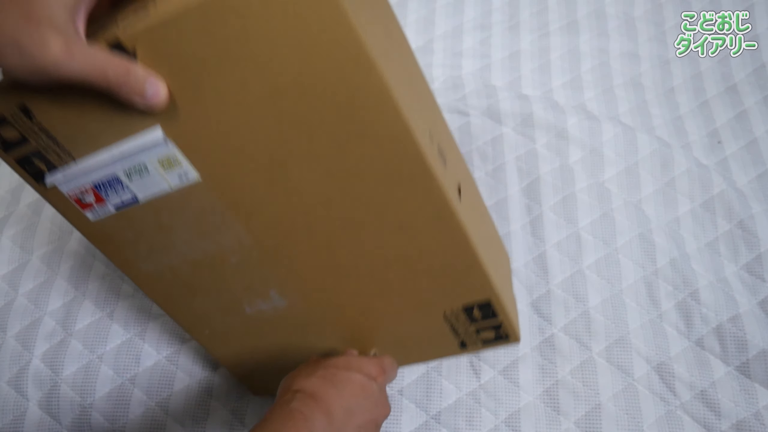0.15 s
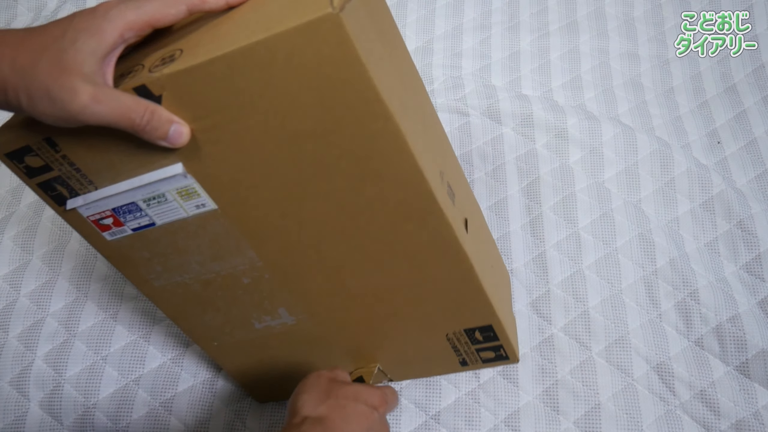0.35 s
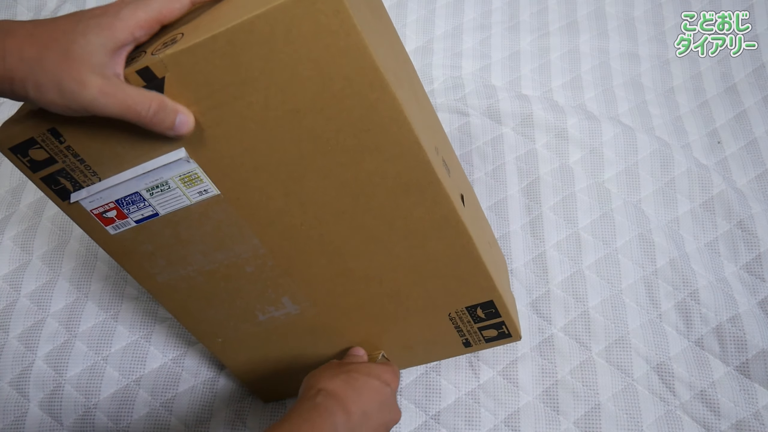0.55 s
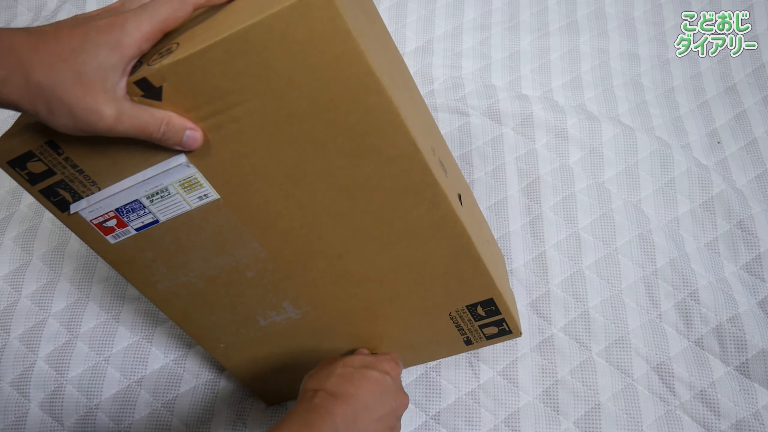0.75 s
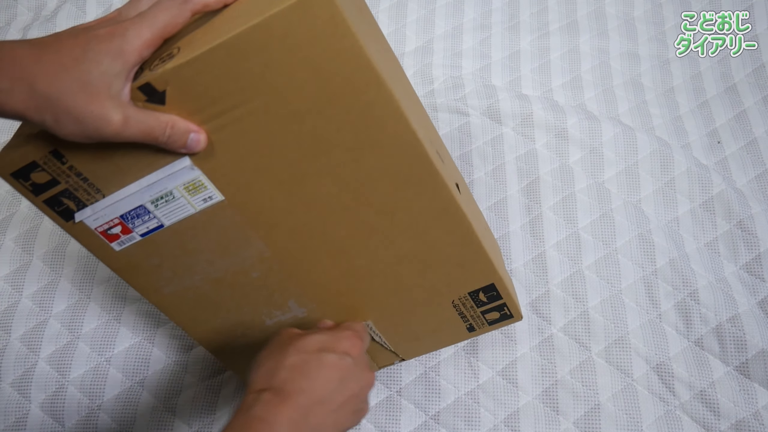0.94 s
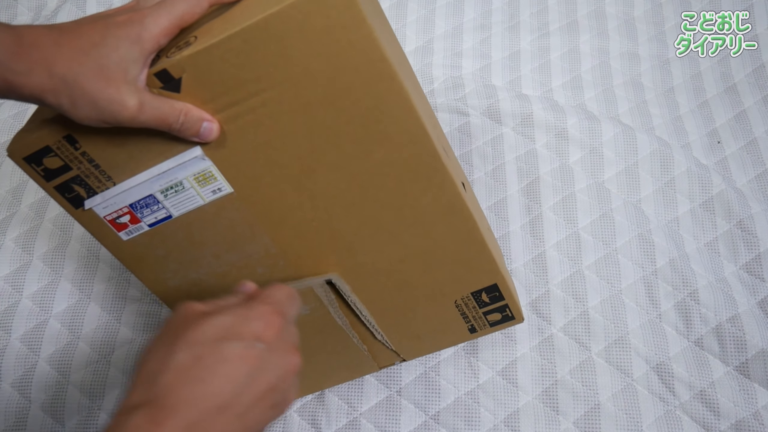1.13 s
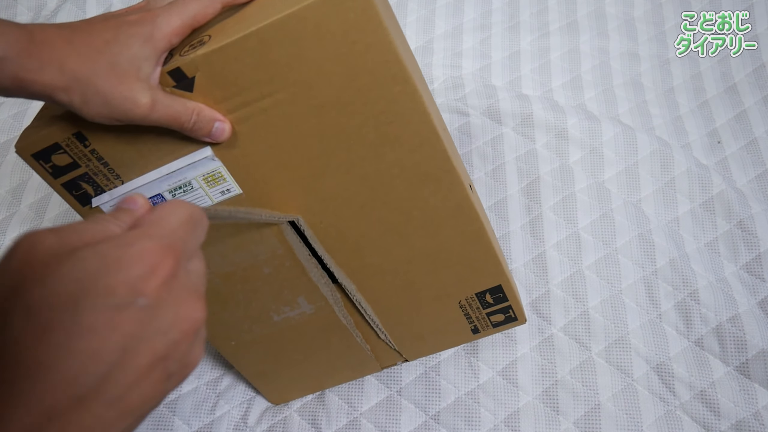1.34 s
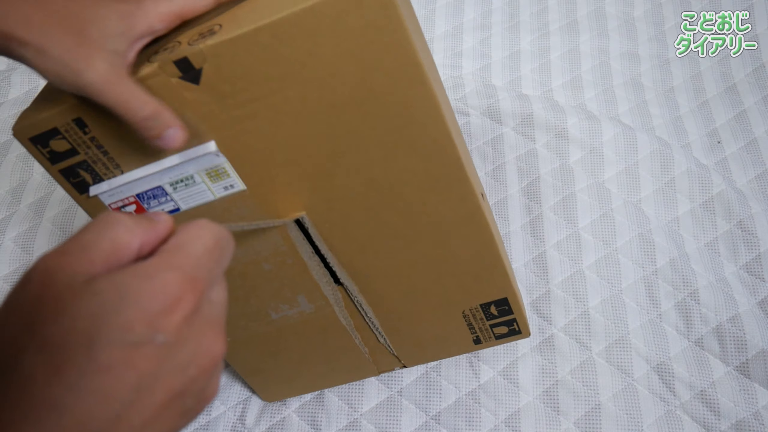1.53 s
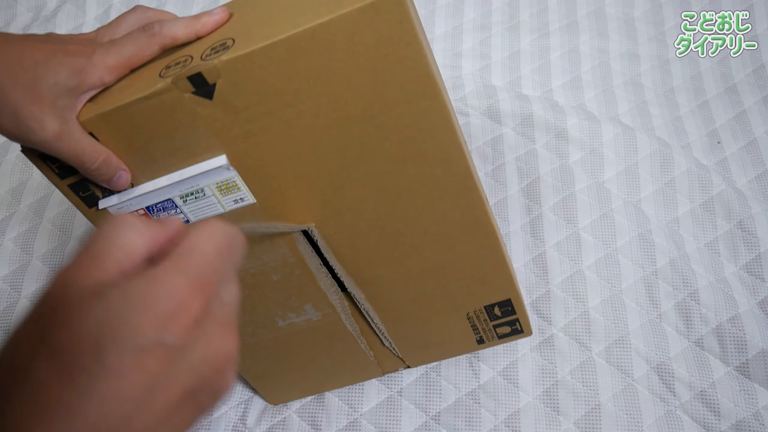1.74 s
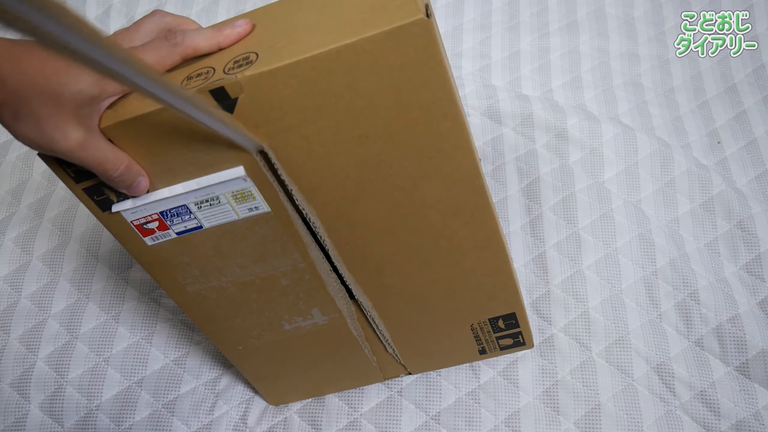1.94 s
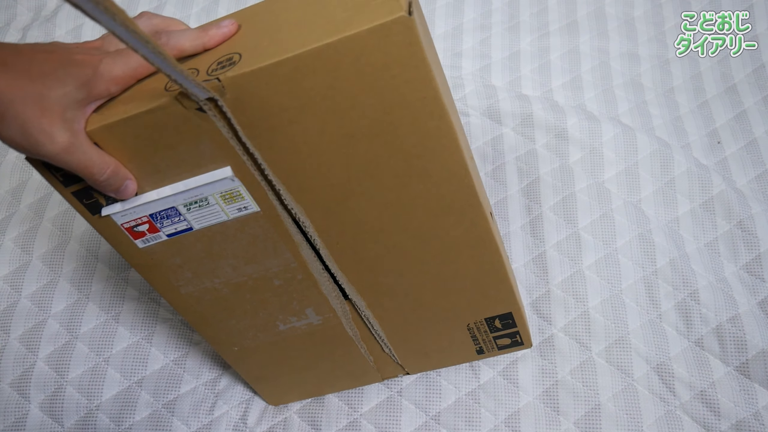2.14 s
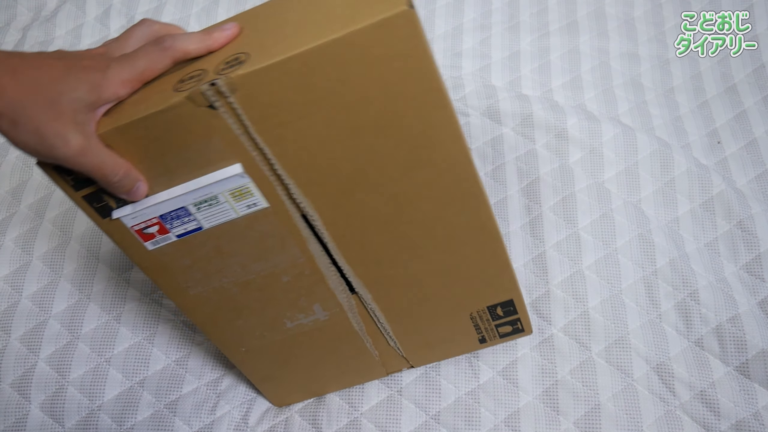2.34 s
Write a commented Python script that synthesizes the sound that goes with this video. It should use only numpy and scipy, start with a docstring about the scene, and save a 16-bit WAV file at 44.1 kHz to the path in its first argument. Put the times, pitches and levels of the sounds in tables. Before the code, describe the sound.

Cardboard box ripped open by hand. Until 0.7 s, nails tick on the tab, skin slides softly on card and a tiny motor ticks faintly until 0.4. From 0.76 to 1.45 a long rip crackles and hisses over rapid hollow thumps, rising in force. A faint slide and low knock follow, a second rip at 1.8-2.17, and a short hissy tear at 2.3. Close stereo, slightly left, soft quiet room.

```python
"""Two long rips and a short last one: the perforated strip is torn by hand out of a corrugated box.
Each bridge of the perforation thumps the ringing box; cracks and fibre hiss are shaped noise, the lid rattles.
Before that, nails tick on the pull tab, hands slide on the card and a small camera motor ticks faintly;
between the rips come a faint low knock and two duller ticks on the card. Place: a quiet soft room with a short
echo, faint low air. Distance: close, a little to one side. Microphone: the stereo pair of the camera."""
import sys
import numpy as np
from scipy import signal
from scipy.fft import rfft, irfft
from scipy.io import wavfile
from scipy.ndimage import uniform_filter1d

SR = 44100
rng = np.random.default_rng(int(sys.argv[2]) if len(sys.argv) > 2 else 0)


def decibels_to_gain(level_db):
    """Convert a level in decibels to a linear amplitude gain (20 dB per decade)."""
    exponent = np.asarray(level_db, float) / 20
    return 10 ** exponent


def log_audio(samples):
    """Write samples as a 16-bit WAV file to the path given in sys.argv[1]."""
    # one column per channel
    frames = np.atleast_2d(samples).T
    # limit to full scale, then quantise
    limited = np.clip(frames, -1, 1)
    pcm = np.round(limited * 32767).astype(np.int16)
    wavfile.write(sys.argv[1], SR, pcm)


N = 109323  # samples

# Spectrum of the room air: f/Hz, level/dB
AIR_SPECTRUM = [(30, 1.5), (230, -26), (460, -21), (820, -32), (16000, -41.5)]
# Spectrum of skin sliding on card: f/Hz, level/dB
SKIN_SPECTRUM = [(700, 5), (2000, -5.5), (7900, 0.5), (16000, -5)]
# Hands sliding on the card: centre t/s, half length t/s, hiss level/dB, rumble level/dB
HAND_SLIDES = [(0.192, 0.14, -53.5, -60), (0.61, 0.18, -52, -54), (0.641, 0.018, -39.5, -60),
               (0.736, 0.022, -45.5, -49.5), (1.547, 0.06, -55, -48.5), (1.7, 0.067, -46, -64)]
# Nail ticks, on the tab in the first second, later two duller ones on the card:
# t/s, push on the panel level/dB, tick level/dB
NAIL_TICKS = [(0.163, -42.5, -56), (0.203, -40, -46), (0.334, -47.5, -42.5), (0.395, -47.5, -32.5),
              (0.404, -44, -33.5), (0.529, -32, -28.5), (0.611, -48, -31.5), (0.632, -43, -26.5),
              (1.795, -56, -34.5), (2.258, -64, -37.5)]
# Modes of the pull tab and the panel round it: f/Hz, level/dB, t60/s
TAB_MODES = [(481, -3.5, 0.11), (575.4, 7, 0.06), (634.6, 3, 0.06)]
# Bright note of a nail tick: f/Hz, level/dB, t60/s
NAIL_MODES = [(1340, 3.5, .015)]
# Modes of the hollow box: f/Hz, level/dB
BOX_MODES = [(72, -3), (108, -6), (142, 3), (192, -5.5), (214, 5.5), (245, -1.5), (320, -6.5)]
# Deepest box modes, whose drive rises and falls over the rips: t/s, drive level/dB
DEEP_DRIVE = [(1.15, -3), (1.35, -24), (1.85, -25), (1.95, -19.5), (2.2, -3.5)]
# The pulled panel tightens and slackens: t/s, pitch of the box modes [ratio]
PANEL_TENSION = [(.9, 0.84), (1.32, 1.088), (1.4, 0.93), (1.83, 0.93), (1.93, 1.04), (2.01, 0.94)]
# Modes of the stiff lid beside the slit: f/Hz, level/dB, t60/s
LID_MODES = [(485.2, -0.5, 0.054), (684, -5.5, 0.011), (1127, -12, 0.03)]
# Spectrum of torn card: f/Hz, level/dB
CARD_SPECTRUM = [(900, -4.5), (2300, -8), (4200, -2.5), (6800, -2.5), (8700, 1.5), (10600, -5),
                 (12500, -3.5), (15500, -9.5), (16300, -55)]
# One list for each pull: t/s, fibre hiss level/dB, shaking of the box level/dB, rattle of the lid level/dB
PULL_LEVELS = [
    [(.762, -35, -35, -32.5), (.768, -32.5, -34.5, -30.5), (.825, -36, -60, -44),
     (.845, -27.5, -24.5, -33.5), (1.11, -30, -22.5, -33), (1.24, -38, -24.5, -35), (1.38, -40, -16, -30.5),
     (1.42, -40.5, -51, -51), (1.47, -62, -35, -53)],
    [(1.805, -47, -50, -53), (1.815, -32.5, -23, -32), (1.93, -34.5, -21.5, -32.5),
     (1.99, -36.5, -24.5, -38), (2.05, -38, -22, -39.5), (2.09, -31.5, -26, -33.5),
     (2.15, -38, -37.5, -44.5), (2.18, -61, -61, -69)],
    [(2.272, -51.5, -54, -74), (2.288, -27, -34.5, -28.5), (2.315, -29, -34, -32.5),
     (2.39, -70.5, -83, -82)],
]
# Thumps of the box: bridges breaking, and one faint low knock at 1.743 before the second rip:
# t/s, relative level/dB
BOX_THUMPS = [(0.867, -13), (0.914, -9.5), (0.963, -15), (0.998, -9.5), (1.074, -12), (1.12, -9.5),
              (1.138, -11), (1.169, -4.5), (1.21, -6.5), (1.224, -10), (1.26, -4.5), (1.276, -3.5),
              (1.301, -8), (1.32, -6), (1.367, -5.5), (1.743, -33), (1.816, -12.5), (1.837, -1),
              (1.866, -16), (1.894, -7.5), (1.907, -11.5), (1.966, -9), (2.01, -11.5), (2.032, -11.5),
              (2.073, -8.5), (2.289, -28)]
# Sharp cracks of the paper liner: t/s, relative level/dB
LINER_CRACKS = [(0.853, -13.5), (0.9017, -11), (0.952, -16.5), (0.988, -17.5), (1.0284, -18.5),
                (1.066, -18), (1.8159, -19), (1.838, -13.5), (1.919, -22.5)]

AIR_DB = -54
WIDE_HZ, WIDE_DB = 2780, -1.5  # corner and level of the left-right difference in every noise
MOTOR_START_S, MOTOR_STOP_S, MOTOR_PER_S = .012, 0.41, 59.94
MOTOR_HZ, MOTOR_T60_S, MOTOR_DB = 2000, 0.029, -33
WEAK_DB, MOTOR_SCATTER_DB = -4, 2.5  # every second tick; spread of all ticks
NAIL_S, TICK_S = .0005, 0.0019  # push of the nail, also its delay; decay of the tick
TAB_RUMBLE_DB, TAB_FREE_S = 8, 1  # tab panel against the box; the tab fades out of the rumble by then
BOX_T60_S, BOX_DAMPING = 0.17, 0.49  # at 200 Hz; power of frequency, so higher modes die sooner
DEEP_UNDER_HZ = 160
BOX_BAND_HZ, LID_LOW_HZ = (58, 350), 430  # band edges that keep the box's thump and the lid's rattle apart
LID_WANDER = .025  # pitch, as a ratio
CRACK_RISE_S, CRACK_FALL_S, CRACK_DB = .0025, .002, -5
THUMP_PUSH_S, THUMP_DB, THUMP_HISS_DB = 0.0022, -8.5, -12
FIBRES_PER_S, FIBRE_SCATTER_DB, FIBRE_S = 2500, 2.5, 0.0016
HISS_DB = -2  # on top of the hiss column of the pulls
PATCHES_PER_S, PATCH_DB = 140, 3
ROOM_T60_S, ROOM_LOW_HZ, ROOM_GAP_S, ROOM_DB = 0.1, 930, 0.0016, -11
RIGHT_LAG_S, LEFT_DB, MIC_LOW_HZ = 4e-5, 1, 50


def unit(x):
    """Scale to rms 1."""
    return x / np.sqrt(np.mean(x ** 2))


def noise(spectrum):
    """Steady noise of a spread-out source: left and right share the bass and differ in the treble."""
    hz, db = np.array(spectrum).T
    f = np.arange(N // 2 + 1) * SR / N + 1  # 1 Hz up, to keep the logarithm finite
    colour = decibels_to_gain(np.interp(np.log(f), np.log(hz), db))
    mid, side = rfft(rng.standard_normal((2, N))) * colour
    side = side * decibels_to_gain(WIDE_DB) * f / np.hypot(f, WIDE_HZ)
    return unit(irfft(mid + np.array([[1], [-1]]) * side, N))


def ring(x, modes, pitch=1):
    """Damped modes whose pitch may glide; a unit impulse gives each its own peak level."""
    turn = 2j * np.pi * np.cumsum(pitch + np.zeros(N)) / SR
    total = 0
    for hz, db, t60 in modes:
        carrier = np.exp(hz * turn)
        # decay at zero frequency, then shift up to the mode
        decay = signal.lfilter([1], [1, -decibels_to_gain(-60 / (t60 * SR))], x / carrier)
        total = total + decibels_to_gain(db) * (carrier * decay).real
    return total


def spikes(times, db):
    """Impulses at the given times."""
    times = np.asarray(times)
    at = np.clip((times * SR).astype(int), 0, N - 1)
    return np.bincount(at, decibels_to_gain(db + 0. * times), N)


def burst(x, rise_s, fall_s):
    """Every impulse becomes a quick swell and fall of its own peak."""
    t = np.arange(-SR // 20, SR // 20 + 1) / SR
    shape = np.exp(np.where(t < 0, t / rise_s, -t / fall_s))
    return np.abs(signal.fftconvolve(x, shape, "same"))


def soften(x, push_s):
    """Spread every impulse into a smooth push of the same area."""
    push = np.exp(-(np.arange(-SR // 100, SR // 100 + 1) / (SR * push_s / 2)) ** 2)
    return np.convolve(x, push / push.sum(), "same")


def walk(per_s):
    """Random levels, held briefly and slewed."""
    hold = SR // per_s
    steps = np.repeat(rng.standard_normal(N // hold + 1), hold)
    return uniform_filter1d(steps, hold // 2)[:N]


def steep(x, hz, kind):
    """Steep filter without delay."""
    return signal.sosfiltfilt(signal.butter(2, hz, kind, fs=SR, output="sos"), x)


def patchy(x):
    """Each half octave swells and drops on its own, so that the colour of the crackle keeps changing."""
    edges = 540 * 2 ** np.arange(0, 5.1, .5)
    bands = zip(edges, edges[1:])
    return unit(sum(decibels_to_gain(PATCH_DB * walk(PATCHES_PER_S)) * steep(x, band, "band") for band in bands))


def room_air():
    """Room air: steady noise, strongest in the bass."""
    return decibels_to_gain(AIR_DB) * noise(AIR_SPECTRUM)


def room_echo(near):
    """The soft room returns a short diffuse tail without deep bass, different left and right."""
    t = np.arange(SR // 2) / SR
    tail = rng.standard_normal((2, len(t))) * decibels_to_gain(-60 * t / ROOM_T60_S) * (t > ROOM_GAP_S)
    tail = tail / np.sqrt(np.sum(tail[0] ** 2))
    tail = signal.lfilter(*signal.butter(1, ROOM_LOW_HZ, "high", fs=SR), tail)
    return decibels_to_gain(ROOM_DB) * signal.fftconvolve(near, tail, axes=1)[:, :N]


def motor():
    """Regular faint ticks, each a short push on one damped mode, every second one weaker on average."""
    k = np.arange(int((MOTOR_STOP_S - MOTOR_START_S) * MOTOR_PER_S))
    db = WEAK_DB * (k % 2) + MOTOR_SCATTER_DB * rng.standard_normal(len(k))
    ticks = spikes(MOTOR_START_S + k / MOTOR_PER_S, db)
    return ring(soften(ticks, 0.0005), [(MOTOR_HZ, MOTOR_DB, MOTOR_T60_S)])


def box(x):
    """The hollow box rings: panel tension moves its pitch and the drive of its deepest modes rises and falls."""
    t = np.arange(N) / SR
    free = decibels_to_gain(np.interp(t, *np.array(DEEP_DRIVE).T))
    pitch = np.interp(t, *np.array(PANEL_TENSION).T)
    total = 0
    for hz, db in BOX_MODES:
        drive = x * free if hz < DEEP_UNDER_HZ else x
        t60 = BOX_T60_S * (200 / hz) ** BOX_DAMPING
        total = total + ring(drive, [(hz, db, t60)], pitch)
    return total


def slides():
    """Skin on card: soft swells of hiss, and a rumble in the box and the tab panel."""
    t = np.arange(N) / SR
    hiss, rumble = np.zeros((2, N))
    for centre, half, hiss_db, rumble_db in HAND_SLIDES:
        swell = np.exp(-((t - centre) / half) ** 2)
        hiss += decibels_to_gain(hiss_db) * swell
        rumble += decibels_to_gain(rumble_db) * swell
    tab_share = decibels_to_gain(TAB_RUMBLE_DB) * np.clip(1 - t / TAB_FREE_S, .05, 1)
    body = unit(box(rng.standard_normal(N)))
    body = body + tab_share * unit(ring(rng.standard_normal(N), TAB_MODES))
    return hiss * noise(SKIN_SPECTRUM) + rumble * body


def nail_ticks():
    """A nail ticks and the panel rings briefly: bright on the tab in the first second, later duller on the card."""
    s, db, tick_db = np.array(NAIL_TICKS).T
    ticks = spikes(s, tick_db)
    on_tab = np.arange(N) < SR  # the first second
    panel = ring(soften(spikes(s + NAIL_S, db), NAIL_S), TAB_MODES)
    bright = ring(soften(ticks * on_tab, NAIL_S), NAIL_MODES)
    return panel + bright + burst(ticks, TICK_S / 10, TICK_S) * noise(CARD_SPECTRUM)


def pull_level(column):
    """Amplitude of one column of the pulls over time, all but silent between them."""
    t = np.arange(N) / SR
    pulls = [np.array(p).T for p in PULL_LEVELS]
    return sum(decibels_to_gain(np.interp(t, p[0], p[column], -120, -120)) for p in pulls)


def rip():
    """The box thumps, the liner cracks; fibres hiss, shake the box and rattle the lid through a pull."""
    hiss, shake, rattle = (pull_level(k) for k in (1, 2, 3))
    scatter = decibels_to_gain(FIBRE_SCATTER_DB * rng.exponential(size=N))
    fibres = (rng.random(N) < FIBRES_PER_S / SR) * scatter
    grain = unit(burst(fibres, FIBRE_S / 10, FIBRE_S))

    s, db = np.array(BOX_THUMPS).T
    thumps = soften(spikes(s, db + THUMP_DB), THUMP_PUSH_S)
    spurts = 1 + burst(spikes(s, THUMP_HISS_DB), CRACK_RISE_S, CRACK_FALL_S)
    s, db = np.array(LINER_CRACKS).T
    cracks = burst(spikes(s, db + CRACK_DB), CRACK_RISE_S, CRACK_FALL_S)

    # rough drives are scaled so that the pull levels set the level of the ringing
    rough, scratch = grain * rng.standard_normal((2, N))
    body = box(shake * rough / box(rough).std() + thumps)
    lid_drive = rattle * spurts * scratch / ring(scratch, LID_MODES).std()
    lid = ring(lid_drive, LID_MODES, 1 + LID_WANDER * walk(20))
    tearing = np.hypot(decibels_to_gain(HISS_DB) * hiss * grain * spurts, cracks) * patchy(noise(CARD_SPECTRUM))
    return steep(body, BOX_BAND_HZ, "band") + steep(lid, LID_LOW_HZ, "high") + tearing


def scene():
    """The box close by, louder and earlier on the left; echo, centred motor and room air are added."""
    near = rip() + nail_ticks() + slides()
    f = np.arange(N // 2 + 1) * SR / N
    right = irfft(rfft(near[1]) * np.exp(-2j * np.pi * f * RIGHT_LAG_S), N)
    direct = np.array([decibels_to_gain(LEFT_DB) * near[0], right])
    return direct + room_echo(near) + motor() + room_air()


def low_pass(x):
    """Removes everything above the highest recorded frequency."""
    return signal.sosfilt(signal.butter(12, 16600, fs=SR, output="sos"), x)


def record(dry):
    """The microphone drops the deepest bass."""
    mix = signal.lfilter(*signal.butter(2, MIC_LOW_HZ, "high", fs=SR), dry)
    return low_pass(mix)


dry = scene()
out = record(dry)
log_audio(out)
```